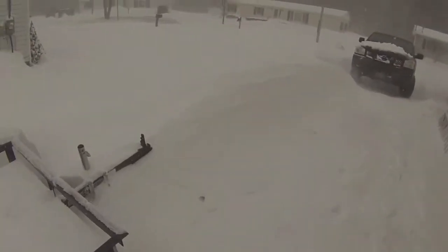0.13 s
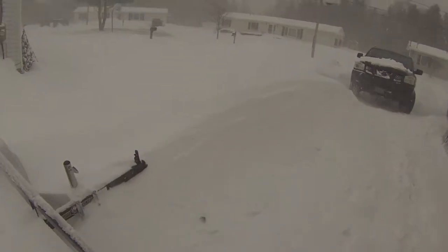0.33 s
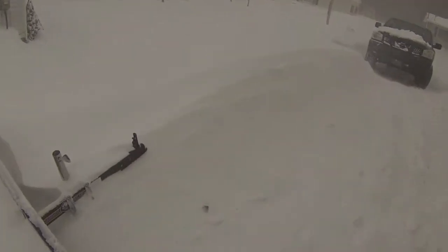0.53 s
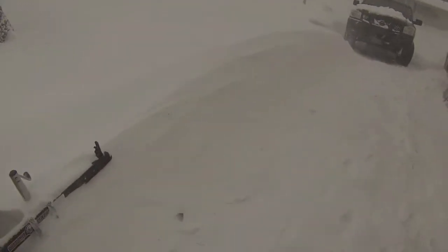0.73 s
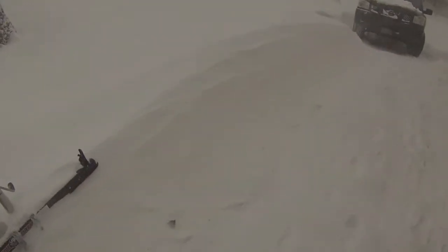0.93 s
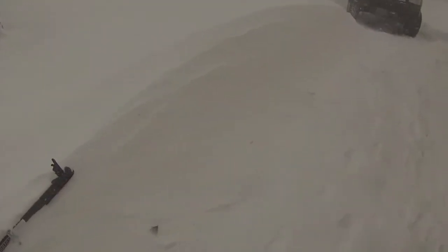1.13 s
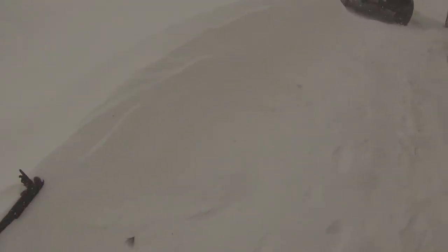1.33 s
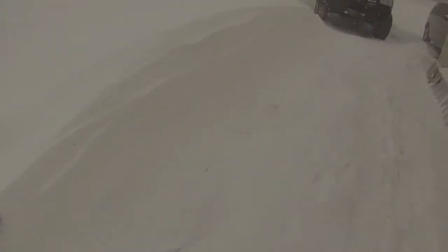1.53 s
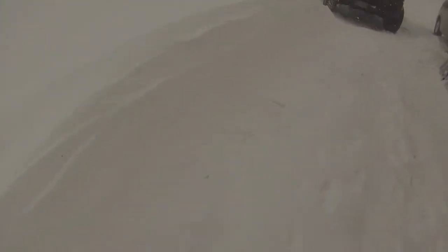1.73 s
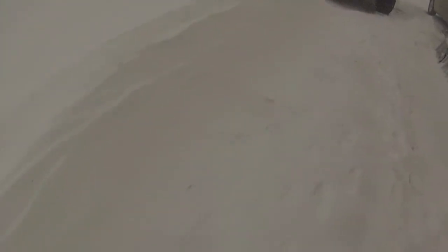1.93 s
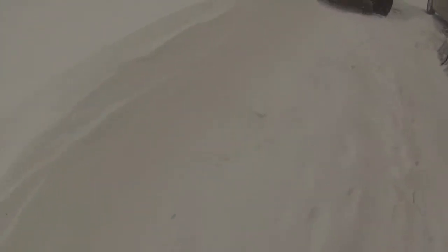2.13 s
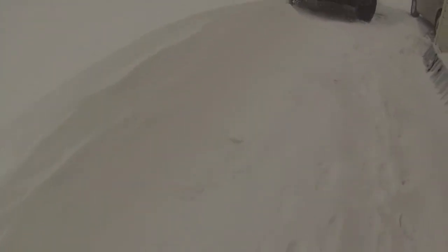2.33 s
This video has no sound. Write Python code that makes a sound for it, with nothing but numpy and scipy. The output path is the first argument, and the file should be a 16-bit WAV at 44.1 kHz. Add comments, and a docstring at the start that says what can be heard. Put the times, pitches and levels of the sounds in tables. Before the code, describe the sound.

Close, rough wind noise on a camera carried through open snow; low fluttering jolts punch through a lumpy rumble, while dry crunches and small hard clicks on the case scatter throughout, thickening in the last third.

```python
"""Open ground in a blizzard, walked with a small camera in a case; every layer meets at its one microphone.
Wind: lumpy low noise buffets the microphone, under a low rush of air and a steady hiss of blowing snow.
Steps and sharp gusts jolt it: brief low swings with a higher thud, and a flutter of eddies around them.
Dry snow crunches and scuffs: clumped random grains, coloured by the resonances of the case.
Icy grains tick on the case as short noise bursts with ringing; two dull knocks are dying sines."""
import sys
import numpy as np
from scipy import signal
from scipy.fft import rfft, irfft, next_fast_len
from scipy.io import wavfile
from scipy.ndimage import uniform_filter1d

SR = 44100
rng = np.random.default_rng(int(sys.argv[2]) if len(sys.argv) > 2 else 0)


def log_audio(samples):
    """Write samples as a 16-bit WAV file to the path given in sys.argv[1]."""
    # one column per channel
    frames = np.atleast_2d(samples).T
    # limit to full scale, then quantise
    limited = np.clip(frames, -1, 1)
    pcm = np.round(limited * 32767).astype(np.int16)
    wavfile.write(sys.argv[1], SR, pcm)


N = 110250
T = np.arange(N) / SR  # s

# All spectra are relative densities: columns [f/Hz, level/dB per Hz].
# Wind buffeting on the microphone: [t/s, level/dB], and its spectrum
BUFFET_LEVEL = [(0, -45), (.05, -30), (.16, -37.5), (.37, -33), (.45, -39), (.52, -46), (.59, -44),
                (.7, -50.5), (.79, -33.5), (.89, -30), (1.04, -35.5), (1.17, -45), (1.3, -33), (1.4, -46),
                (1.53, -34), (1.69, -35.5), (1.74, -37), (1.83, -33.5), (1.88, -46), (1.92, -30.5),
                (1.96, -43.5), (2.01, -34), (2.05, -51.5), (2.22, -32.5), (2.28, -45), (2.36, -39.5),
                (2.45, -50.5), (2.485, -35)]
BUFFET_COLOUR = [(15, -16.5), (25, -2.5), (38, -2), (52, -4), (70, -14.5), (95, -33), (300, -69)]
# Low rush of air: [t/s, level/dB], and its spectrum
RUSH_LEVEL = [(0, -51.5), (.09, -56.5), (.17, -49.5), (.29, -48.5), (.38, -60.5), (.75, -60), (.805, -48.5),
              (.86, -60), (.95, -55.5), (1.2, -59.5), (1.29, -51.5), (1.4, -58.5), (1.48, -55.5),
              (1.75, -56.5), (1.95, -59.5), (2.11, -52), (2.28, -58.5)]
RUSH_COLOUR = [(80, -1.5), (140, 3.5), (190, 0.5), (290, -3.5), (360, -2), (500, -13), (750, -8),
               (1000, -13), (1600, -10.5), (4000, -69)]
# Hiss of blowing snow: spectrum
HISS_COLOUR = [(290, -19.5), (500, 1), (868, -14), (1230, 3), (1360, -1.5), (1930, -5), (2070, -4),
               (2810, -7.5), (3540, -12), (5090, -12), (5600, -15), (7980, -17.5), (10700, -25),
               (14900, -28), (16000, -69)]
HISS_DB, HISS_FLICKER_DB, HISS_FLICKER_HZ = -61, 1.8, 28
# Snow crunches and scuffs:
# [start t/s, length/s, body level/dB, treble level/dB, spread of grain sizes/dB]
SNOW_SCUFFS = [(.004, 0.017, -49, -55, 2.5), (0.06, 0.078, -60, -61.5, 6.5),
               (0.147, 0.084, -59.5, -82, 8.5), (0.241, 0.085, -51, -59, 1), (0.332, 0.056, -58, -62, 7.5),
               (0.483, 0.034, -74, -66, 11), (0.617, 0.06, -57, -65, 4.5), (0.71, 0.015, -52.5, -60, -1.5),
               (0.759, 0.01, -64, -60, 3.5), (0.779, 0.1436, -50.5, -59.5, 1), (0.81, 0.062, -48.5, -56, 7),
               (0.831, 0.045, -51, -47.5, 0.5), (1.002, 0.078, -63, -85, -2.5), (1.1, 0.037, -52.5, -56, 4),
               (1.171, 0.12, -63, -69, 7), (1.289, 0.053, -55.5, -57, 4), (1.356, 0.029, -53, -53, 6),
               (1.421, 0.085, -57.5, -64, 4), (1.513, 0.073, -53, -53.5, 4.5), (1.611, 0.25, -56, -59, 8),
               (1.894, 0.052, -58.5, -70, 12), (1.987, 0.23, -56.5, -62.5, 5), (2.078, 0.048, -50, -56, 2),
               (2.142, 0.17, -61.5, -68, 8)]
# Crunch spectra: hollow body, crisp treble
BODY_COLOUR = [(400, -6), (1000, -10), (1230, 2.5), (1420, 2), (1600, -0.5), (1750, -6.5), (1980, 4.5),
               (2280, -4.5), (2520, 5), (2720, -9), (2900, 1.5), (3250, -10), (4500, -39.5), (9000, -28.5)]
TREBLE_COLOUR = [(1500, -25), (2800, 1), (3600, 1.5), (4250, 8.5), (5000, 6), (6000, 1), (7200, 4.5),
                 (9000, -5.5), (10300, -4), (11300, 0), (12500, -4.5), (15000, -8.5), (17000, -36)]
# Hollow resonances of the case: [f/Hz]
HOLLOW_HZ = [1290, 1690, 2040, 2620]
# High resonances of the case: [f/Hz]
HIGH_CASE_HZ = [4540, 5200, 6900, 7650, 9650, 11240]
# Dull knocks of the case: [t/s, starting level/dB, f/Hz]
CASE_KNOCKS = [(.012, -38.5, 270), (0.152, -38.5, 380)]
# Icy grains on the case: [t/s, knock level/dB, crack level/dB, fizz level/dB, knock f/Hz]
ICE_TICKS = [(0.019, -63, -51, -50.5, 1820), (.155, -45, -65, -51.5, 1230), (0.291, -40.5, -49, -57, 1900),
             (.304, -46, -51.5, -55, 2500), (.333, -38, -51, -43, 1670), (0.363, -66, -60, -57, 2000),
             (0.379, -61, -65, -48.5, 1370), (0.617, -50, -60, -63, 1410), (0.667, -58, -52, -57, 2000),
             (0.698, -41.5, -57, -56, 2200), (0.71, -43, -55, -47.5, 1600), (0.83, -38, -58, -51, 1840),
             (0.867, -54, -61, -44, 1700), (1.067, -83, -54, -56, 2020), (1.0956, -59, -44, -50, 2000),
             (1.371, -66, -53, -55, 1510), (1.392, -51, -54, -63, 1900), (1.592, -40, -50, -49.5, 1500),
             (1.661, -42, -47.5, -46, 1690), (1.723, -58, -62, -53, 2010), (1.753, -39, -45.5, -52, 1900),
             (1.78, -53, -54, -54, 2000), (1.859, -65, -55, -52.5, 1960), (1.892, -49.5, -57, -57.5, 2650),
             (1.906, -47.5, -54, -54, 1860), (1.974, -44, -47, -57, 2020), (2.01, -48, -44.5, -47.5, 1800),
             (2.041, -51, -54, -49.5, 1980), (2.075, -48, -53, -50.5, 2020), (2.121, -56, -48, -62, 1700),
             (2.138, -46, -47, -61, 1910), (2.196, -49, -55, -49, 1910), (2.39, -50, -73, -72, 1490),
             (2.408, -51, -53.5, -61.5, 1400), (2.456, -40.5, -50.5, -60, 1520),
             (2.479, -51, -54, -51, 2970), (2.493, -52, -44, -56, 2500)]
# Jolts of the microphone: [t/s, envelope peak level/dB, f/Hz, half width before the peak/s]
MIC_JOLTS = [(.136, -26, 51.7, 0.0064), (0.2509, -8, 34.6, 0.012), (0.341, -24, 29.6, 0.016),
             (0.407, -29.5, 38.6, 0.0094), (.818, -13.5, 40.4, 0.0126), (0.891, -21.5, 50.8, 0.015),
             (1.488, -18, 40.2, 0.0074), (1.631, -25.5, 24.5, 0.016), (1.795, -27, 28, 0.006),
             (2.102, -12, 41, 0.013), (2.198, -23, 33.7, 0.0088)]

# Eddies around a jolt; the level is relative to a jolt of the flutter's own pitch
FLUTTER_HZ, FLUTTER_DB, FLUTTER_DECAY_S = 85.4, -9, 0.026

SCUFF_ATTACK_S, SCUFF_RELEASE_S = 0.0066, 0.01
GRAINS_PER_S, SMOOTH_SHARE = 2500, 0.76  # smooth noise relative to the evened grains
CLUMP_DB, CLUMP_HZ = 3, 82  # grains break in clumps
PATCHY_DB, PATCHY_HZ = 3, 32  # changing colour of the crunch

# Spits: larger grains ringing the case, at levels relative to the crunch's body and treble
SPITS_PER_S, SPIT_SPREAD_DB = 130, 3.5
BODY_SPIT_DB, BODY_SPIT_DECAY_S = -6.5, 0.0013
TREBLE_SPIT_DB, TREBLE_SPIT_DECAY_S = -5, 0.00051

DULL_KNOCK_DECAY_S = 0.0059

TICK_SPAN_S = 0.0019  # a tick's energy is its level held over this time
KNOCK_DECAY_S, CRACK_DECAY_S = 0.0023, 0.00085
KNOCK_RING_DB = -0.5  # ring relative to noise when knock and fizz are equal
DULL_RINGS = 0.28  # duller ticks ring more purely: dB of ring per dB of knock over fizz
CASE_RING_DB, CASE_DECAY_S, CASE_SPREAD_DB = -4.5, 0.0016, 4

JOLT_TAIL = 2.07  # a jolt dies this much slower than it grows
THUD_DB, THUD_PITCH_RATIO, THUD_WIDTH_RATIO = -23, 1.66, 0.64  # relative to the swing

CUTOFF_HZ = 15500


def from_db(db):
    """Decibels to gain."""
    return 10 ** (np.asarray(db) / 20)


def rms_one(x):
    """Scale to rms 1."""
    return x / np.sqrt(np.mean(x ** 2) + 1e-20)


def level(curve):
    """Gain along a [t/s, level/dB] curve."""
    return from_db(np.interp(T, *np.transpose(curve)))


def drift(rate_hz):
    """Slow random wander with rms 1: noise through two equal low-pass poles."""
    r = np.exp(-2 * np.pi * rate_hz / SR)
    noise = rng.standard_normal(2 * N)
    return rms_one(signal.lfilter([1], [1, -2 * r, r * r], noise)[N:])  # settled half


def colour(x, spectrum):
    """Causal (minimum-phase) filter with the given [f/Hz, level/dB] shape; rms 1."""
    size = next_fast_len(2 * N)
    hz, db = np.transpose(spectrum)
    shape_db = np.interp(np.log(np.fft.rfftfreq(size, 1 / SR) + 1), np.log(hz), db)
    # folding the cepstrum forward in time gives minimum phase
    cepstrum = irfft(np.log(from_db(shape_db)), size)
    cepstrum[1:size // 2] *= 2
    cepstrum[size // 2 + 1:] = 0
    response = np.exp(rfft(cepstrum))
    return rms_one(irfft(rfft(x, size) * response, size)[:N])


def evened(x, span_s):
    """Hold the level near 1 over the given span."""
    power = uniform_filter1d(x ** 2, max(2, int(span_s * SR)))
    return x / np.sqrt(np.abs(power) + 1e-9)


def wind():
    """Eddies rumble on the microphone and flutter higher around jolts; air rushes and blowing snow hisses."""
    rumble = evened(colour(rng.standard_normal(N), BUFFET_COLOUR), span_s=0.084)
    rumble = level(BUFFET_LEVEL) * rms_one(rumble)
    rush = level(RUSH_LEVEL) * colour(rng.standard_normal(N), RUSH_COLOUR)
    hiss_gain = from_db(HISS_DB + HISS_FLICKER_DB * drift(HISS_FLICKER_HZ))
    hiss = hiss_gain * colour(rng.standard_normal(N), HISS_COLOUR)
    return rumble + flutter() + rush + hiss


def flutter():
    """Small eddies make a narrow band of noise that swells and dies around each jolt."""
    band = signal.butter(2, [FLUTTER_HZ / 1.2, FLUTTER_HZ * 1.2], "band", fs=SR, output="sos")
    noise = signal.sosfilt(band, rng.standard_normal(2 * N))[N:]
    eddies = rms_one(evened(noise, span_s=0.068))
    strength = np.zeros(N)
    for s, db, hz, _ in MIC_JOLTS:
        shedding = (hz / FLUTTER_HZ) ** 2  # slower jolts shed less
        strength += from_db(db + FLUTTER_DB) * shedding * np.exp(-np.abs(T - s) / FLUTTER_DECAY_S)
    return eddies * strength


def snow():
    """Clumps of breaking grains, with a hollow body and a crisp treble, swell under each scuff."""
    body_power, treble_power, spread, weight = np.zeros((4, N))
    for s, length, body_db, treble_db, spread_db in SNOW_SCUFFS:
        attack = 2 * np.minimum(T - s, 0) / SCUFF_ATTACK_S
        release = 2 * np.maximum(T - s - length, 0) / SCUFF_RELEASE_S
        power = np.exp(attack - release)
        body_power += power * from_db(body_db) ** 2
        treble_power += power * from_db(treble_db) ** 2
        spread += power * spread_db
        weight += power
    spread = spread / (weight + 1e-20)
    coarse = spread / spread.mean()

    crackle = evened(grains(GRAINS_PER_S, spread), span_s=0.033)
    crackle = crackle + SMOOTH_SHARE * rng.standard_normal(N)
    clumps = from_db(CLUMP_DB * coarse * drift(CLUMP_HZ))
    crackle = evened(crackle * clumps, span_s=0.069)

    body_spits = from_db(BODY_SPIT_DB) * coarse * spits(HOLLOW_HZ, BODY_SPIT_DECAY_S)
    hollow = rms_one(patchy(colour(crackle, BODY_COLOUR)) + body_spits)
    treble_modes = [*HIGH_CASE_HZ, HIGH_CASE_HZ[-1]]  # the top resonance rings twice
    treble_spits = from_db(TREBLE_SPIT_DB) * coarse * spits(treble_modes, TREBLE_SPIT_DECAY_S)
    crisp = rms_one(patchy(colour(crackle, TREBLE_COLOUR)) + treble_spits)
    return np.sqrt(body_power) * hollow + np.sqrt(treble_power) * crisp


def grains(rate, spread_db):
    """Random clicks at a mean rate per second, many small and a few large."""
    sizes = from_db(spread_db * np.minimum(rng.exponential(1, N), 4.5))
    return sizes * rng.choice([-1, 1], N) * (rng.random(N) < rate / SR)


def patchy(x):
    """Each third of an octave flickers on its own, so the crunch keeps changing colour."""
    whole = rfft(x, 2 * N)
    octave = np.log2(np.fft.rfftfreq(2 * N, 1 / SR) + 1)
    out = np.zeros(N)
    for centre in np.arange(24, 44) / 3:  # about 255 Hz to 20.6 kHz
        share = np.maximum(0, 1 - 3 * np.abs(octave - centre))  # overlapping triangles
        band = irfft(whole * share, 2 * N)[:N]
        out += band * from_db(PATCHY_DB * drift(PATCHY_HZ))
    return rms_one(out)


def spits(modes, decay_s):
    """Larger grains ring the given resonances of the case, each with a mix of its own."""
    signs = np.sign(grains(SPITS_PER_S, 1))
    clicks = signs * from_db(SPIT_SPREAD_DB * rng.standard_normal(N))
    r = np.exp(-1 / (decay_s * SR))
    out = np.zeros(N)
    for hz in modes:
        w = 2 * np.pi * hz * rng.uniform(.97, 1.05) / SR
        strengths = from_db(CASE_SPREAD_DB * np.clip(rng.standard_normal(N), -2, 1))
        strengths = strengths * rng.choice([-1, 1], N)
        # two-pole resonator: every click starts a decaying sine
        out += signal.lfilter([0, np.sin(w)], [1, -2 * r * np.cos(w), r * r], clicks * strengths + 1e-18)
    return rms_one(out)


def knocks():
    """The case knocks softly: a low sine that dies within a few cycles."""
    out = np.zeros(N)
    for s, db, hz in CASE_KNOCKS:
        t = np.maximum(T - s, 0)
        out += from_db(db) * np.exp(-t / DULL_KNOCK_DECAY_S) * np.sin(2 * np.pi * hz * t)
    return out


def ticks():
    """Each icy grain gives a knock, a crack and a fizz, ringing the case in a mix of its own."""
    out = np.zeros(N + SR)
    t = T[:SR // 40]

    def burst(low_hz, high_hz, decay_s, ring):
        """A dying puff of noise in one band, with ringing added; rms 1."""
        band = signal.butter(3, [low_hz, high_hz], "band", fs=SR, output="sos")
        puff = rng.standard_normal(len(t)) * np.exp(-t / decay_s)
        return rms_one(rms_one(signal.sosfilt(band, puff)) + ring)

    def case_ring(modes):
        """The given resonances, struck with random strengths."""
        rings = sum(from_db(rng.normal(0, CASE_SPREAD_DB)) * np.sin(2 * np.pi * hz * t) for hz in modes)
        return from_db(CASE_RING_DB) * rms_one(rings * np.exp(-t / CASE_DECAY_S))

    for s, knock_db, crack_db, fizz_db, hz in ICE_TICKS:
        ring = rms_one(np.sin(2 * np.pi * hz * t) * t * np.exp(-2 * t / KNOCK_DECAY_S))
        ring = ring * from_db(KNOCK_RING_DB + DULL_RINGS * (knock_db - fizz_db))
        knock = burst(hz * 0.6, hz * 1.61, KNOCK_DECAY_S, ring)
        crack = burst(3250, 6850, CRACK_DECAY_S, case_ring(HIGH_CASE_HZ[:3]))
        fizz = burst(6400, 13600, CRACK_DECAY_S, case_ring(HIGH_CASE_HZ[3:]))
        tick = from_db(knock_db) * knock + from_db(crack_db) * crack + from_db(fizz_db) * fizz
        start = int(s * SR)
        out[start:start + len(t)] += tick * np.sqrt(TICK_SPAN_S / t[-1])
    return out[:N]


def jolts():
    """Each jolt shakes the microphone through a swing or two, with a shorter, higher thud on top."""
    out = np.zeros(N)
    for s, db, hz, width in MIC_JOLTS:
        t = T - s
        widths_away = t / np.where(t < 0, width, width * JOLT_TAIL)
        swing = np.exp(-widths_away ** 2) * np.sin(2 * np.pi * hz * t)
        thud_envelope = np.exp(-(widths_away / THUD_WIDTH_RATIO) ** 2)
        thud = thud_envelope * np.sin(2 * np.pi * hz * THUD_PITCH_RATIO * t)
        out += from_db(db) * (swing + from_db(THUD_DB) * thud)
    return out


def scene():
    """Wind, snow, case and jolts sum at one microphone."""
    return (wind() + snow() + knocks() + ticks() + jolts())[None]


def record(dry):
    """The recorder cuts the top with a steep low-pass filter."""
    low_pass = signal.ellip(10, .2, 80, CUTOFF_HZ, fs=SR, output="sos")  # ripple/dB, stopband/dB
    return signal.sosfilt(low_pass, dry)


dry = scene()
out = record(dry)
log_audio(out)
```